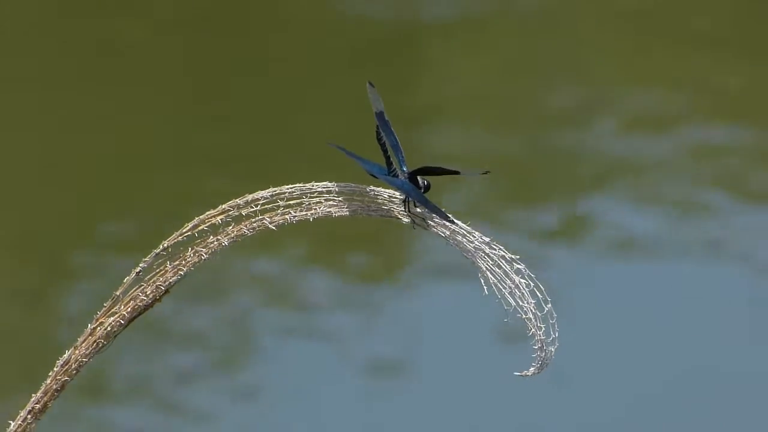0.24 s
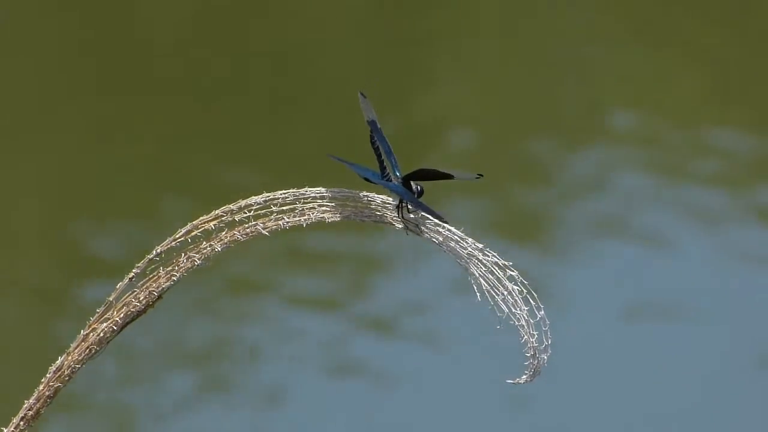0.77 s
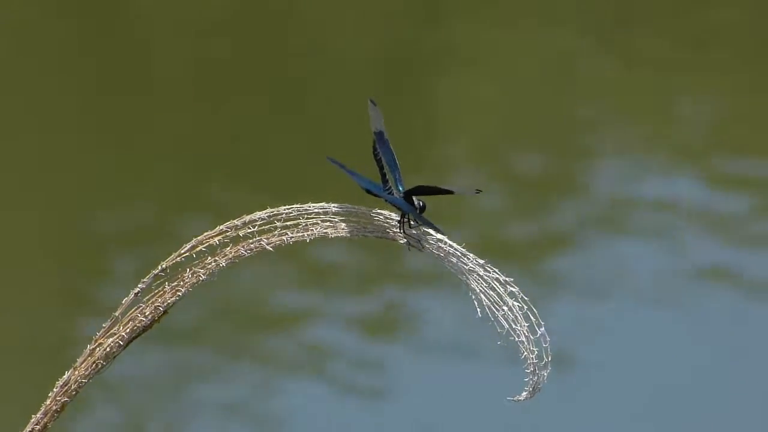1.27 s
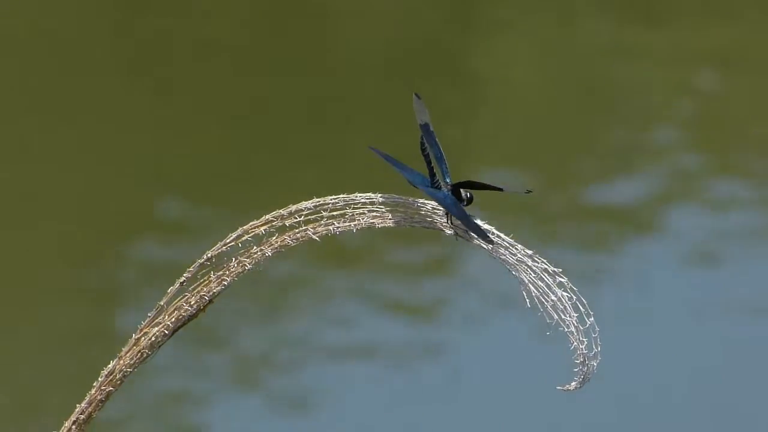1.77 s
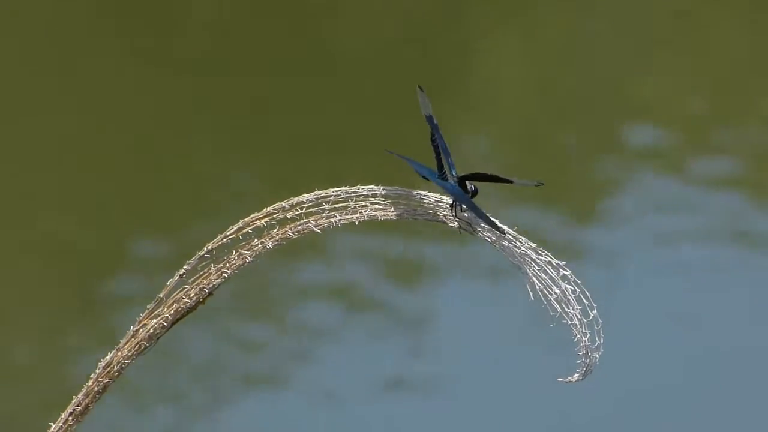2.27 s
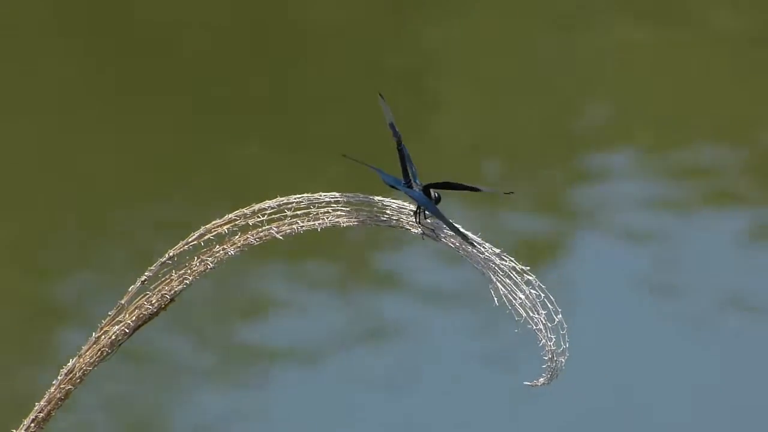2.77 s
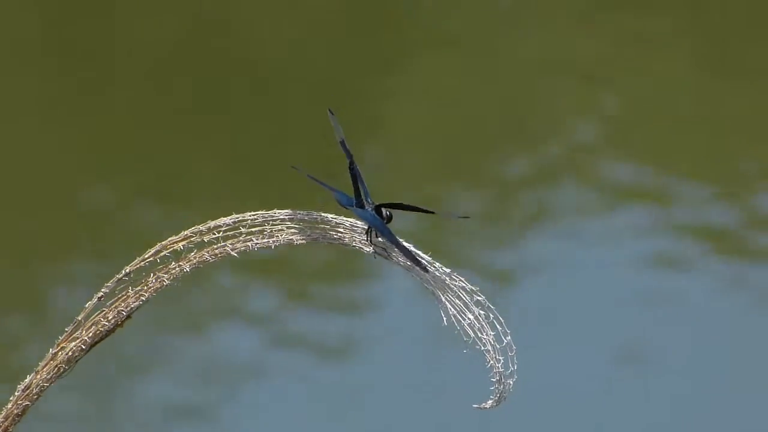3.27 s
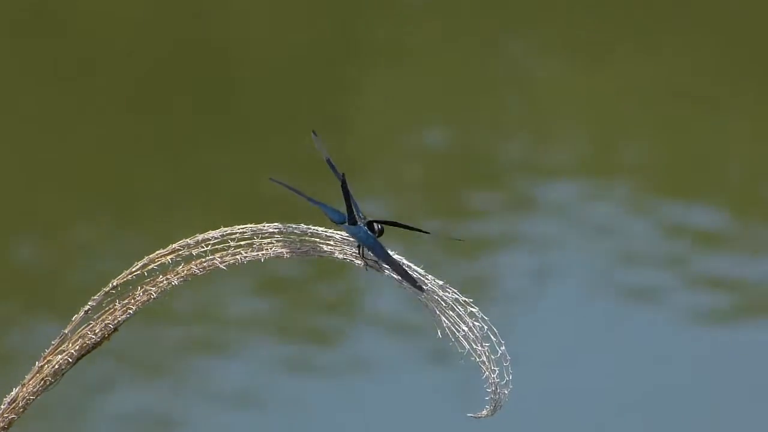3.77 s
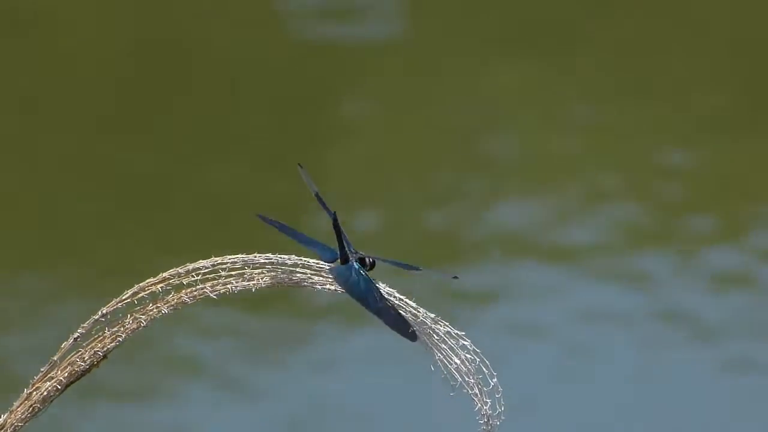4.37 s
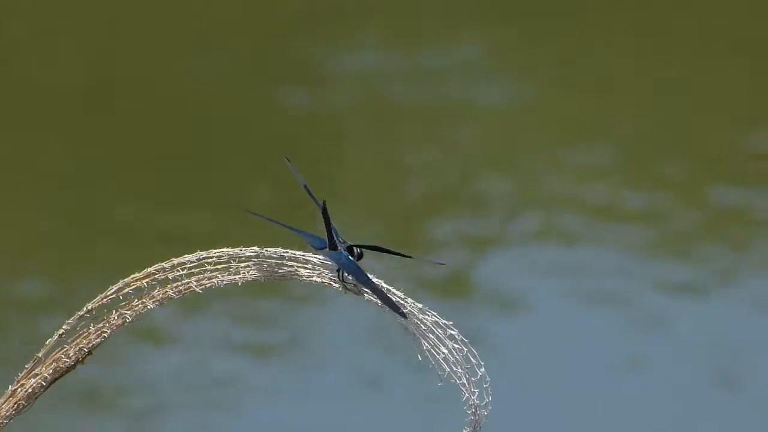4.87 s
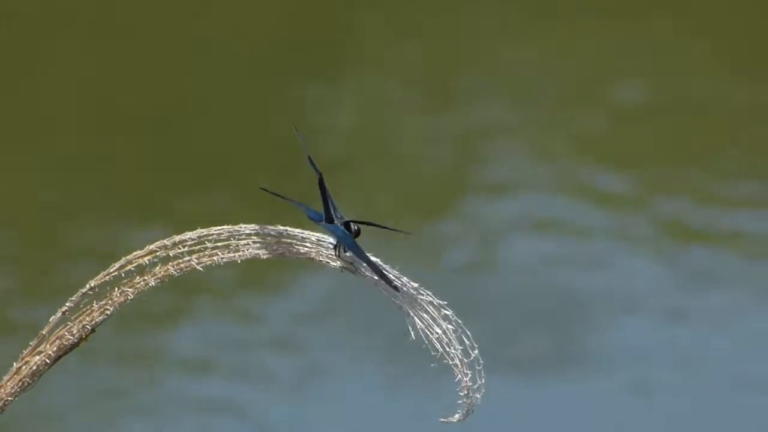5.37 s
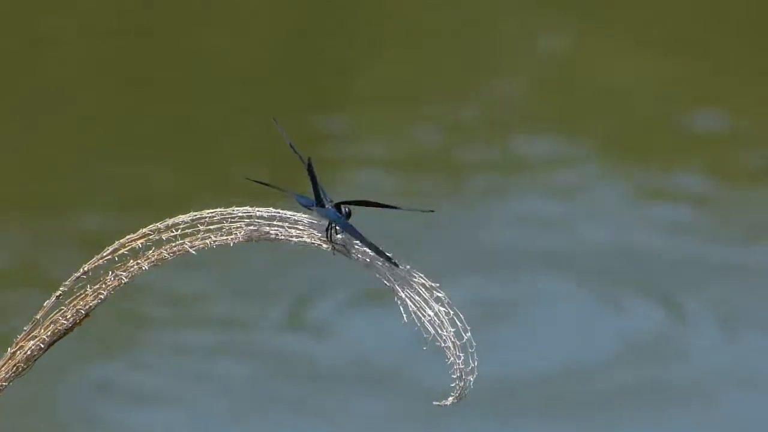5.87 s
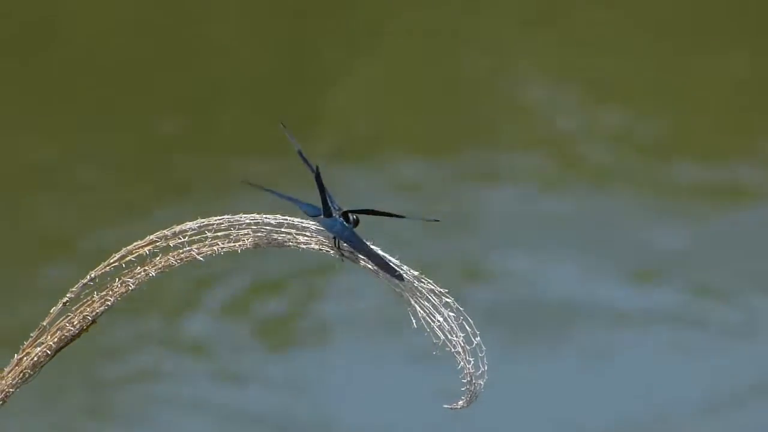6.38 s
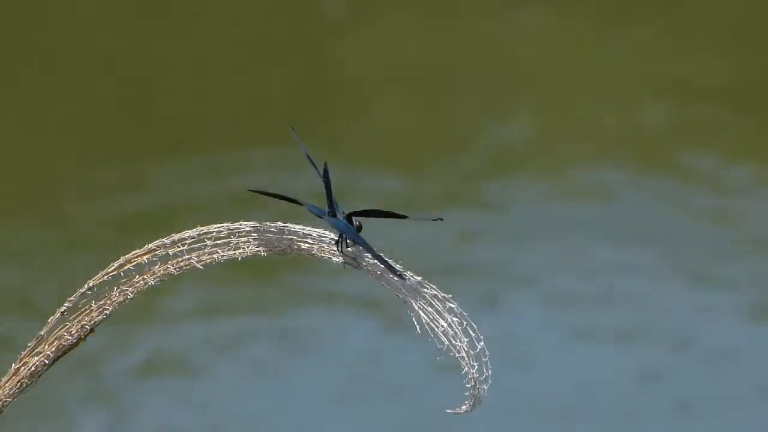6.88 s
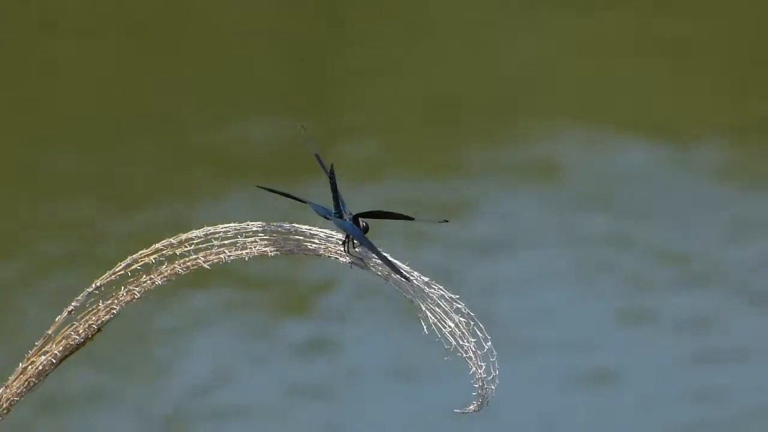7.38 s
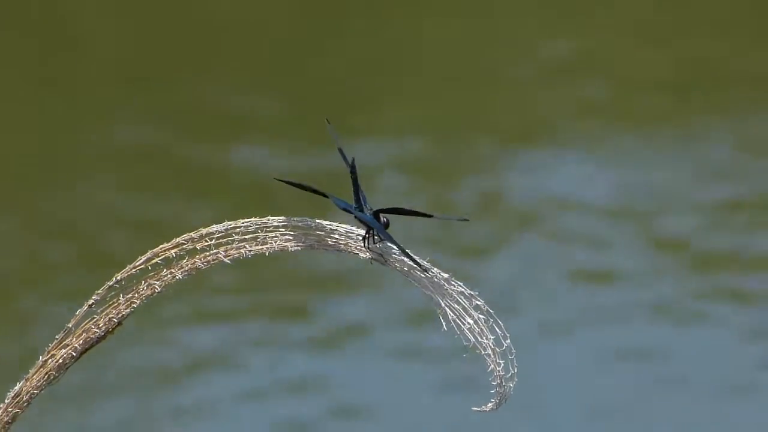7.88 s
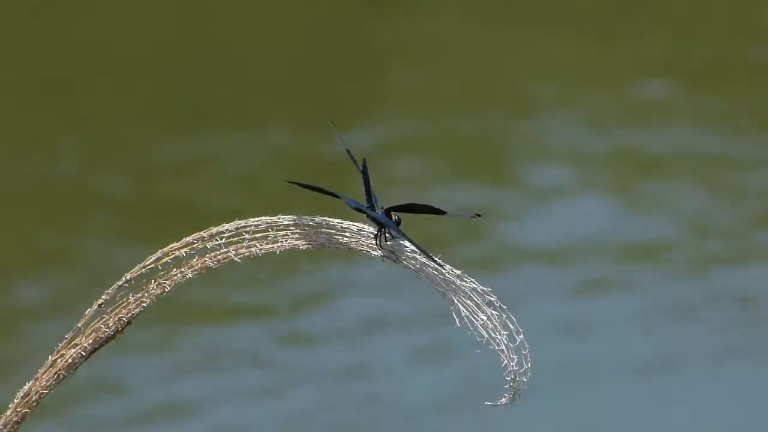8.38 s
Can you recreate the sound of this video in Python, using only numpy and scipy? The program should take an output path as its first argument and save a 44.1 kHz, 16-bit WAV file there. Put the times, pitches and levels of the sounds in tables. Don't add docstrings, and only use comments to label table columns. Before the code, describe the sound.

From 0 to about 8.7 seconds, a loud cicada chorus surrounds a summer pond. Countless near clicks merge into a continuous, bright, sizzling drone, strongest around 5 to 9 kHz, swaying only slightly; its shrill upper part slowly strengthens, drifting left. Beneath it, farther cicadas around 2 to 3.7 kHz throb gently four or five times a second, swelling a little near 5.8. A very faint town hum holds low behind, with distant vehicles passing, the clearest at the start and another near 4. Soft rushes of air come around 1.1-2, 3.8-4.4 and 6.2-6.9. A distant, blurred machine whine near 1.6 kHz wavers from 3.9 to 6.4, then returns shorter and clearer from 6.7 to 8.1. The stereo camera microphone's noise gate breaks the faint sounds into watery specks, with tiny dropouts. The perched dragonfly is silent.

```python
import sys
import numpy as np
from scipy import signal
from scipy.fft import rfft, irfft, next_fast_len
from scipy.io import wavfile
from scipy.ndimage import uniform_filter1d

SR = 44100
rng = np.random.default_rng(int(sys.argv[2]) if len(sys.argv) > 2 else 0)


def file_out(sig):
    cols = np.atleast_2d(sig).T
    lim = np.clip(cols, -1, 1)
    pcm = np.round(lim * 32767).astype(np.int16)
    wavfile.write(sys.argv[1], SR, pcm)


def volts_from_db(level):
    exponent = np.asarray(level, float) / 20
    return 10 ** exponent


N = 381024

# freq_hz, density_db_per_hz
NEAR_BODY = [(3300, -54), (3750, -25), (3950, -22), (4200, -21.5), (4360, -22.5), (4700, -11.5),
             (5500, -6.5), (7030, -8), (7900, 2.5), (8800, 0.5), (10000, -14), (11300, -23), (14000, -26),
             (15200, -26)]
# freq_hz, density_db_per_hz
FAR_BODY = [(1800, -40.5), (2010, -7), (2170, -12.5), (2240, -4), (2500, -0.5), (2640, 4), (2750, 1),
            (3200, 2), (3450, -1), (3560, -2.5), (3700, -5), (3900, -40)]
# start_s, held_s, level_db, pitch_hz, tone_over_blur_ratio
WHINES = [
    (3.88, 1.9, -52.5, 1638, 0.74),
    (6.7, .78, -52.5, 1644, 1.7),
]
# time_s, change_db
WAFTS = [(4.23, 2.5), (4.33, 4), (4.68, 4), (4.8, -1), (5.05, 8), (5.2, -2), (5.54, 4), (5.67, 2),
         (5.92, -11), (6.12, 4.5), (7.24, -5), (7.35, 0), (7.66, 7), (7.96, 11)]
# start_s, length_s, level_db, centre_hz
RUSHES = [
    (1.135, 0.86, -59, 1320),
    (3.774, 0.59, -53.5, 1275),
    (6.203, 0.65, -58.5, 1345),
]
# freq_hz, density_db_per_hz
HUM_SPECTRUM = [(10, 10), (30, -14), (48, -7), (95, -60), (160, -12), (260, -4.5), (385, 0.5), (430, -1),
                (570, -2.5), (630, 3), (740, -1), (1000, -3), (1350, -10), (1550, -9.5), (1950, -13.5)]
# nearest_s, level_db
PASSES = [
    (0.1, -62),
    (0.9, -70.5),
    (1.9, -69.5),
    (2.95, -71),
    (4.05, -66.5),
    (5.15, -73),
    (5.95, -69),
    (6.7, -72.5),
]
# freq_hz, correlation
PORT_LIKENESS = [(30, 0.47), (120, 0.38), (330, -0.23), (650, -0.33), (1100, 0.14), (2000, 0.5),
                 (2800, 0.65), (3800, 0.46), (4700, 0.73), (5900, 0.81), (7600, 0.74), (8900, 0.52),
                 (11500, 0.44), (14500, 0.16)]
# freq_hz, left_over_right_db
PORT_LEAN = [(60, 3), (250, -4), (760, -1), (1500, -7.5), (2400, 1.5), (4100, 0.7), (5850, -0.3),
             (7000, 1.0), (8500, 0), (9650, 2.5), (10700, 1.5), (13100, -3.5), (15000, 6)]
# freq_hz, threshold_db
GATE = [(70, -30), (110, 5), (190, 4.5), (300, 0), (900, 0), (1250, 3.5), (1480, 10), (1900, 10),
        (2150, 4.5), (2700, 0), (3300, 1), (3620, 6), (3900, 2), (4300, 0), (5000, -10), (9500, -10),
        (11100, 4.5), (14100, 5.5), (14900, 11), (15300, 13)]
# time_s, threshold_rise_db
GATE_DIPS = [
    (0.26, 10.5),
    (1.71, 4.5),
    (2.05, 1),
    (3.751, 5),
    (4.6, 10.5),
    (5.24, 4),
    (5.92, 13),
    (6.77, 7.5),
    (8.33, 5),
]

SPLIT_HZ = 7280
DEEP_DB, SHRILL_DB = -24, -24.9
SHRILL_GROWS_DB_PER_S, SHRILL_LEFTWARD_DB_PER_S = 0.15, 0.2
FAR_DB, FAR_THROBS_PER_S = -43.5, 4.6
FAR_SWELL_S, FAR_SWELL_LENGTH_S, FAR_SWELL_DB = 5.8, 2.5, 0.88
WHINE_RISE_S, WHINE_RISE_DB, WHINE_FADE_S, WHINE_FADE_DB = 0.097, -30, 0.61, -17.5
WHINE_SAG_HZ_PER_S, WHINE_LOWER_JOINS_S, WHINE_FLUTTER_DB = 8, 0.45, 1
WHINE_BLUR_HZ, WHINE_LOWER_RATIO, WHINE_APART_HZ = 55, 0.42, 38
WHINE_PORTS_DB = np.array([[0.1], [4.5]])
WAFT_S = 0.033
HUM_DB = -51
PASS_NEARS_DB_PER_S, PASS_LEAVES_DB_PER_S = 48, 20
MIC_OFFSET = -0.00357
GATE_FRAME, GATE_LEAD = 2048, 1024 - 113


def evened(x):
    return x / np.sqrt(np.mean(x ** 2) + 1e-20)


def read(points, hz):
    f, value = np.transpose(points)
    return np.interp(np.log(hz + 1), np.log(f + 1), value)


def drift(top_hz):
    t = np.arange(0, N, 64) / SR
    waves = 0
    for f in np.geomspace(top_hz / 20, top_hz, 24):
        waves = waves + np.sin(2 * np.pi * (f * t + rng.random())) / np.sqrt(f)
    return np.interp(np.arange(N) / SR, t, evened(waves))


def at_ports(a, b, gain):
    size = next_fast_len(N)
    hz = np.fft.rfftfreq(size, 1 / SR)
    same = np.clip(read(PORT_LIKENESS, hz), -1, 1)
    common = np.sqrt((1 + same) / 2) * rfft(a, size)
    apart = np.sqrt((1 - same) / 2) * rfft(b, size)
    lean = volts_from_db(read(PORT_LEAN, hz) / 2)
    ports = np.array([(common + apart) * lean, (common - apart) / lean])
    return evened(irfft(ports * gain(hz), size)[:, :N])


def clicks(per_s):
    size = rng.standard_normal((2, N))
    return size * (rng.random((2, N)) < per_s / SR)


def near_cicadas():
    t = np.arange(N) / SR

    def upper(hz):
        return 1 / (1 + (SPLIT_HZ / (hz + 1)) ** 24)

    deep = at_ports(*clicks(30000), lambda hz: volts_from_db(read(NEAR_BODY, hz)) * np.sqrt(1 - upper(hz)))
    shrill = at_ports(*clicks(30000), lambda hz: volts_from_db(read(NEAR_BODY, hz)) * np.sqrt(upper(hz)))
    deep_db = DEEP_DB + 0.2 * drift(9.3)
    shrill_db = SHRILL_DB + SHRILL_GROWS_DB_PER_S * t + 0.31 * drift(6.5)
    pan_db = SHRILL_LEFTWARD_DB_PER_S * (t - t.mean()) / 2
    return deep * volts_from_db(deep_db) + shrill * volts_from_db(shrill_db + np.array([pan_db, -pan_db]))


def far_cicadas():
    t = np.arange(N) / SR
    song = at_ports(*clicks(20000), lambda hz: volts_from_db(read(FAR_BODY, hz)))
    level_db = FAR_DB + FAR_SWELL_DB * np.exp(-((t - FAR_SWELL_S) / FAR_SWELL_LENGTH_S) ** 2)
    beat = np.cos(2 * np.pi * FAR_THROBS_PER_S * t + 2.46 * drift(1.44) + 0.47)
    throb_db = (0.85 + 0.5 * drift(1.0)) * beat
    return song * volts_from_db(level_db + throb_db + 0.5 * drift(37))


def whine(start_s, held_s, level_db, pitch_hz, tone_over_blur):
    t = np.arange(N) / SR - start_s
    after_hold = np.clip((t - held_s) / WHINE_FADE_S, 0, 1)

    carrier_hz = pitch_hz - WHINE_SAG_HZ_PER_S * t + 3 * drift(3.5)
    carrier = np.exp(2j * np.pi * np.cumsum(carrier_hz) / SR)
    joined = np.clip((t - WHINE_LOWER_JOINS_S) / WHINE_RISE_S, 0, 1)
    lower_level = joined * (WHINE_LOWER_RATIO + 0.26 * drift(2.48))
    lower = lower_level * np.exp(-2j * np.pi * np.cumsum(WHINE_APART_HZ + 5 * drift(2.4)) / SR)

    pole = np.exp(-np.pi * WHINE_BLUR_HZ / SR)
    blur = rng.standard_normal((2, N)) + 1j * rng.standard_normal((2, N))
    blur = signal.lfilter([1], [1, -2 * pole, pole * pole], blur)
    blur /= np.sqrt(np.mean(abs(blur) ** 2))

    steady = tone_over_blur * (1 - after_hold)
    quarter_turn = np.array([[1], [1j]])
    tone = ((blur + steady * (quarter_turn + lower)) * carrier).real

    rise_db = WHINE_RISE_DB * np.clip(1 - t / WHINE_RISE_S, 0, 1)
    fade_db = WHINE_FADE_DB * after_hold ** 0.5
    waft_db = sum(db * np.exp(-((t + start_s - s) / WAFT_S) ** 2) for s, db in WAFTS)
    shape_db = rise_db + fade_db + waft_db + WHINE_FLUTTER_DB * drift(12)
    inside = uniform_filter1d(1.0 * ((t > 0) & (t < held_s + WHINE_FADE_S)), size=800)
    return tone * volts_from_db(level_db + shape_db + WHINE_PORTS_DB) * inside


def rushes():
    t = np.arange(N) / SR
    out = 0
    for start_s, length_s, level_db, centre_hz in RUSHES:
        air = at_ports(*rng.standard_normal((2, N)), lambda hz: 1 / (1 + ((hz - centre_hz) / 150) ** 2))
        progress = np.clip((t - start_s) / length_s, 0, 1)
        out = out + volts_from_db(level_db) * air * np.sin(np.pi * progress ** 0.57) ** 2
    return out


def town_hum():
    t = np.arange(N) / SR
    wash = at_ports(*rng.standard_normal((2, N)), lambda hz: volts_from_db(read(HUM_SPECTRUM, hz)) * (hz < 2600))
    wash = wash * volts_from_db(HUM_DB + 0.44 * drift(4) + 1.1 * drift(60))
    rumble = at_ports(*rng.standard_normal((2, N)), lambda hz: 1 / (1 + ((hz - 160) / 50) ** 4))
    passing = 0
    for nearest_s, level_db in PASSES:
        since_s = t - nearest_s
        slope_db = np.minimum(PASS_NEARS_DB_PER_S * since_s, -PASS_LEAVES_DB_PER_S * since_s)
        passing = passing + volts_from_db(level_db + slope_db)
    return wash + rumble * passing * volts_from_db(4 * drift(30))


def scene():
    whines = sum(whine(*row) for row in WHINES)
    return near_cicadas() + far_cicadas() + whines + rushes() + town_hum()


def low_pass(x):
    return signal.sosfilt(signal.butter(12, 15270, fs=SR, output="sos"), x)


def record(dry):
    padded = np.pad(dry, ((0, 0), (GATE_LEAD, 0)))
    hz, t, z = signal.stft(padded, SR, "cosine", nperseg=GATE_FRAME)
    t = t - GATE_LEAD / SR
    both = np.sqrt((abs(z) ** 2).mean(0))
    quiet = uniform_filter1d(np.percentile(both, 20, axis=1), size=7)[:, None]

    top = hz > 10800
    faint = (hz < 1900) | top
    wobble = evened(uniform_filter1d(rng.standard_normal(both.shape), size=28, axis=0))
    wobble_db = (1.5 + 1.5 * top[:, None]) * wobble
    raised_db = faint[:, None] * sum(db * (abs(t - s) < 0.014) for s, db in GATE_DIPS)
    threshold = quiet * volts_from_db(read(GATE, hz)[:, None] + wobble_db + raised_db)

    z = z * (both > threshold)
    gated = signal.istft(z, SR, "cosine", nperseg=GATE_FRAME)[1][:, GATE_LEAD:GATE_LEAD + N]
    return low_pass(gated + MIC_OFFSET)


dry = scene()
out = record(dry)
file_out(out)
```